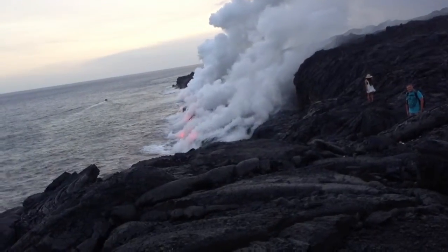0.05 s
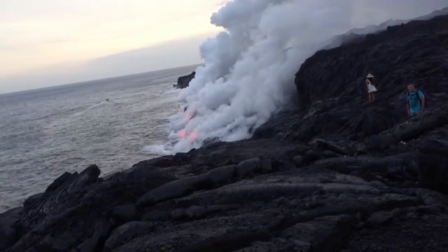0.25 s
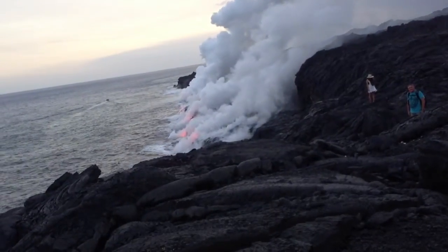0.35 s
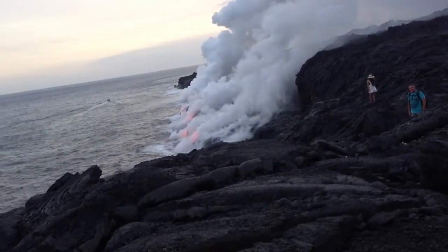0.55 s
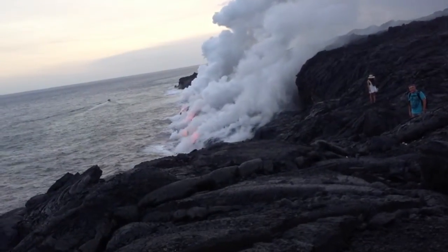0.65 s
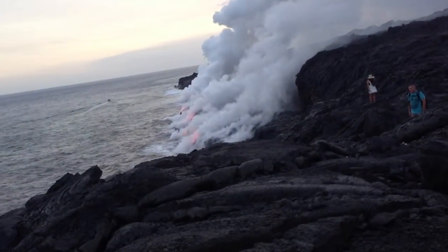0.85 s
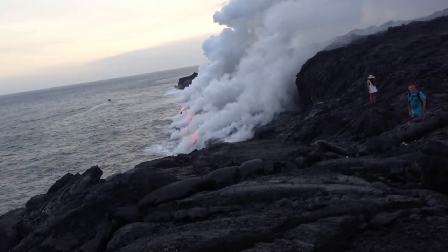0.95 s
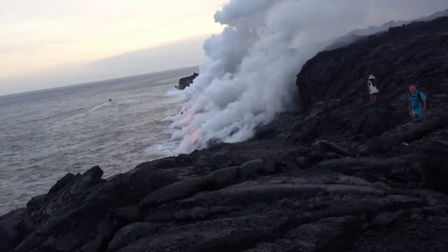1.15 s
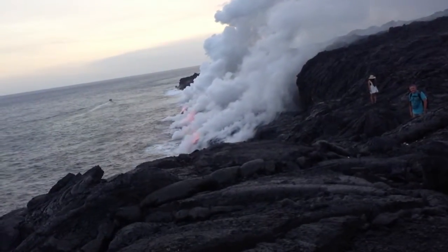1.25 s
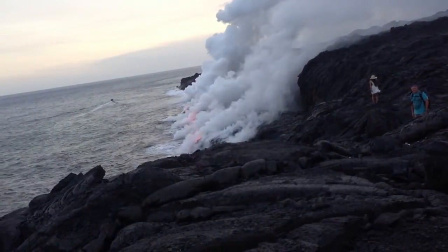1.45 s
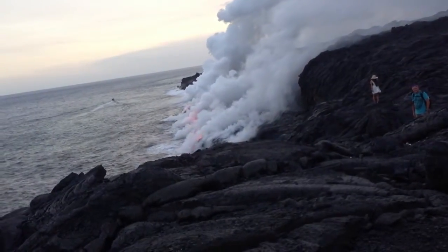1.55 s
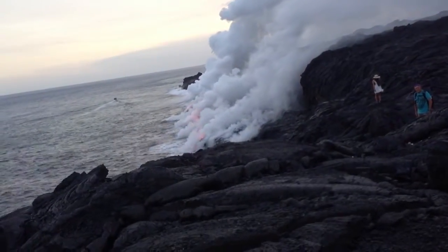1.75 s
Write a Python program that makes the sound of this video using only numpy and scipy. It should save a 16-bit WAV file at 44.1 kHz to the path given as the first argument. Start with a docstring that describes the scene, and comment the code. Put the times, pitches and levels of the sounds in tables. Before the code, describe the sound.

Gusty wind flutters and thumps on the microphone over distant surf and hissing steam.

```python
"""Lava runs into the sea below a rocky shore. From the start distant surf roars, the steam plume hisses,
and gusty wind flutters on the microphone, whose low-cut leaves a hollow rumble. Small washes of water
come and go on the rocks, and single eddies strike the microphone port as soft thumps. A faint tick leads
into the strongest gust, near 0.85 s, where the stronger flow reaches higher in pitch. A second flurry
of thumps lands around 1.5 s; then the wind drops away under the surf and steam."""
import sys
import numpy as np
from scipy import signal
from scipy.fft import rfft, irfft
from scipy.io import wavfile
from scipy.ndimage import uniform_filter1d, map_coordinates

SR = 44100
rng = np.random.default_rng(int(sys.argv[2]) if len(sys.argv) > 2 else 0)


def put_to_file(sound):
    """Save the sound as 16-bit audio at rate SR, in the file named by the first command-line argument."""
    columns = np.atleast_2d(sound).T  # one column per channel
    safe = np.clip(columns, -1, 1)
    whole_steps = np.round(safe * 32767)
    wavfile.write(sys.argv[1], SR, whole_steps.astype(np.int16))


N = 79380

# wind strength at the microphone: t/s, level/dB
WIND_STRENGTH = [(0, -45), (.11, -44), (.2, -46), (.27, -40.5), (.33, -49.5), (.40, -45.5), (.445, -41),
                 (.49, -51), (.56, -45.5), (.625, -44), (.67, -46), (.70, -45.5), (.745, -46), (.77, -42.5),
                 (.81, -40.5), (.86, -33.5), (.905, -36), (.976, -44), (1.045, -41), (1.08, -47),
                 (1.14, -51.5), (1.22, -47), (1.315, -43.5), (1.35, -48), (1.392, -38.5), (1.425, -40),
                 (1.465, -39), (1.555, -41), (1.59, -53.5), (1.63, -45.5), (1.684, -51), (1.758, -52),
                 (1.8, -62)]
# tone of the wind's low rumble and of the flutter above it: f/Hz, relative level/dB
RUMBLE_EQ = [(20, -74), (45, -52), (65, -23.5), (90, -17.5), (130, -1.5), (175, -0.5), (230, -1.5),
             (300, -9), (400, -24.5), (600, -37), (1200, -71)]
FLUTTER_EQ = [(150, -50), (260, 10.5), (350, 9.5), (430, -6.5), (520, -10), (620, -42), (900, -62),
              (2000, -69)]
# tone of the surf, the steam plume and the even hiss behind it: f/Hz, relative level/dB
SURF_EQ = [(20, -72), (80, -1), (200, -6.5), (450, -0.5), (600, -1.5), (780, -3.5), (1020, -9), (1250, -6),
           (1500, -8.5), (2200, -13), (3500, -20), (8000, -45)]
STEAM_EQ = [(500, 2.5), (1500, -9), (2300, -6.5), (3000, -1.5), (3600, -2), (4500, -4.5), (5600, -7.5),
            (7000, -12.5), (10000, -19.5), (15000, -38)]
HISS_EQ = [(100, -2), (5000, 2), (10000, 3), (15000, 3)]
# slow rise and fall of the surf and of the steam: t/s, level/dB
SURF_FADER = [(0, -54.5), (.18, -55), (.46, -56), (.6, -54.3), (.75, -55.5), (1.12, -56.5), (1.19, -56),
              (1.3, -56.5), (1.58, -56.5), (1.8, -55.5)]
STEAM_FADER = [(0, -62.5), (.5, -62), (.62, -61), (.8, -62.5), (1.15, -63), (1.34, -62.5), (1.43, -64.5),
               (1.8, -64.5)]
# small washes of water on the rocks: t/s, level/dB, centre f/Hz
WASH_CUES = [(.05, -65, 1300), (.17, -66, 1260), (.365, -63, 1280), (.55, -60.5, 1310), (.63, -66, 3080),
             (1.19, -61.5, 1190), (1.34, -66.5, 2550), (1.755, -66, 1330)]
# eddies striking the port: t/s, thump level/dB before trim, thump f/Hz, bright edge level/dB
EDDY_CUES = [(.113, -51, 150, -50), (0.237, -28, 262.4, -50), (0.269, -30, 196, -58),
             (0.424, -29, 230, -36.5), (.438, -32, 192, -41.5), (0.472, -38, 310, -44),
             (.598, -29, 167, -60), (0.63, -30.5, 236, -58), (.792, -23.5, 254, -52),
             (0.826, -24.5, 182, -51), (.844, -22, 196, -42), (.854, -13.5, 205, -31),
             (.863, -39, 234, -43.5), (.873, -19.5, 315, -42), (0.946, -34, 263, -43),
             (1.015, -36, 296, -66), (1.392, -26.5, 242, -54), (1.4, -30, 184, -47),
             (1.457, -27.5, 182, -35.5), (1.474, -26.5, 200, -49), (1.501, -20.5, 180, -44),
             (1.514, -34, 232, -43), (1.537, -26, 266, -35.5), (1.546, -26.5, 176, -44),
             (1.561, -28, 182, -44), (1.616, -28.5, 244, -44)]
# tone of the tick: f/Hz, relative level/dB
TICK_EQ = [(1500, -30), (4000, 6), (8000, -4), (15000, -14)]


def amp(db):
    """Decibels to gain."""
    return 10 ** (np.asarray(db) / 20)


def unit(x):
    """Scaled to rms 1."""
    return x / np.sqrt(np.mean(x ** 2) + 1e-20)


def curve(rows):
    """An automation line through (t/s, value) points, one value per sample."""
    return np.interp(np.arange(N) / SR, *np.transpose(rows))


def wobble(rate):
    """Smooth random modulation, rate knots a second."""
    return map_coordinates(rng.standard_normal(1024), [np.arange(N) * rate / SR], mode="mirror")


def filtered(x, response):
    """x through a filter given as gain against frequency."""
    return irfft(rfft(x) * response(np.fft.rfftfreq(N, 1 / SR)), N)


def coloured(x, eq):
    """x through an EQ of (f/Hz, level/dB) points, brought to rms 1."""
    f, db = np.transpose(eq)
    return unit(filtered(x, lambda hz: amp(np.interp(np.log(hz + 1), np.log(f), db))))


def turbulence(eq):
    """Coloured noise, levelled so that it flutters quickly but holds its power over longer stretches."""
    noise = coloured(rng.standard_normal(N), eq)
    power = uniform_filter1d(uniform_filter1d(noise ** 2, size=900), size=900)
    return unit(noise / np.sqrt(np.abs(power) + 1e-6))


def rush(eq, patchy_db):
    """A noise bed textured with brief patches of random gain across time and frequency."""
    spectrogram = signal.stft(rng.standard_normal(N), nperseg=512)[2]
    patches = uniform_filter1d(rng.standard_normal(spectrogram.shape), size=5, axis=0)
    patches = uniform_filter1d(patches, size=10, axis=1)
    textured = signal.istft(spectrogram * amp(patchy_db * unit(patches)), nperseg=512)[1][:N]
    return coloured(textured, eq)


def wind(breeze_db=-51, flutter_growth=1.45):
    """Wind buffets the microphone: one strength drives a rumble and a higher flutter that grows faster."""
    strength_db = curve(WIND_STRENGTH)
    rumble = turbulence(RUMBLE_EQ) * amp(strength_db - 1 + 3.5 * wobble(60))
    flutter_db = breeze_db - 12.5 + flutter_growth * (strength_db - breeze_db)
    flutter = turbulence(FLUTTER_EQ) * amp(flutter_db + 2.5 * wobble(70.43))
    return rumble + flutter


def surf():
    """Waves on the rocks far below blend into a steady roar."""
    return rush(SURF_EQ, patchy_db=0.8) * amp(curve(SURF_FADER))


def steam():
    """Sea water boils off the lava: a bright, textured bed over an even hiss."""
    plume = rush(STEAM_EQ, patchy_db=1.43) * amp(curve(STEAM_FADER))
    hiss = rush(HISS_EQ, patchy_db=0.2) * amp(-69)
    return plume + hiss


def washes(half_width_s=0.023, skirt_db=-29):
    """Water washes over the rocks, each time a short swell of hiss around its own pitch."""
    out, t = np.zeros(N), np.arange(N) / SR
    for at_s, db, hz in WASH_CUES:
        band = [(hz / 8, -80), (hz / 2, skirt_db), (hz, 0), (hz * 2, skirt_db), (hz * 8, -80)]
        swell = np.exp(-((t - at_s) / half_width_s) ** 2)
        out += coloured(rng.standard_normal(N), band) * amp(db) * swell
    return out


def eddies(rise_s=0.0028, fall_s=0.0057, sag_oct_per_s=80, trim_db=-1.24):
    """Each eddy thumps the port: a sinking pressure swing of a cycle or two, with a quick bright edge."""
    edge_centre_hz, edge_spread_oct, edge_half_width_s = 447, 0.12, 0.0028
    out = np.zeros(N)
    for at_s, db, hz, edge_db in EDDY_CUES:
        t = np.arange(N) / SR - at_s
        slowing_time = t * (1 - np.log(2) * sag_oct_per_s * t / 2)  # the pitch sinks as the eddy passes
        edge_hz = edge_centre_hz * 2 ** (edge_spread_oct * rng.standard_normal())
        edge = np.sin(2 * np.pi * (edge_hz * slowing_time + rng.random()))
        thump = np.sin(2 * np.pi * (hz * slowing_time + rng.random()))
        flick = np.exp(-(t / edge_half_width_s) ** 2)
        swell = np.exp(-(t / np.where(t < 0, rise_s, fall_s)) ** 2)
        out += amp(db + trim_db) * swell * thump + amp(edge_db) * flick * edge
    return signal.sosfilt(signal.butter(2, 110, "highpass", fs=SR, output="sos"), out)


def tick(at_s=0.793, db=-57.5, half_width_s=0.0031):
    """One faint treble tick just ahead of the strongest gust."""
    t = np.arange(N) / SR - at_s
    return coloured(rng.standard_normal(N), TICK_EQ) * amp(db) * np.exp(-(t / half_width_s) ** 2)


def scene():
    """Close wind over the distant shore, mixed in mono."""
    return (wind() + eddies() + surf() + steam() + tick() + washes())[None]


def record(dry):
    """The microphone chain cuts the deep bass and all above its band limit; both ends get a tiny fade."""
    low_cut_hz, top_hz = 65, 15330
    low_cut = lambda hz: 1 / np.sqrt(1 + (low_cut_hz / (hz + 1)) ** 4)
    fades = signal.windows.tukey(N, 0.004)
    return filtered(dry[0] * fades, lambda hz: low_cut(hz) * (hz < top_hz))[None]


dry = scene()
out = record(dry)
put_to_file(out)
```